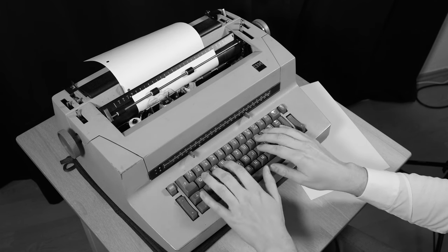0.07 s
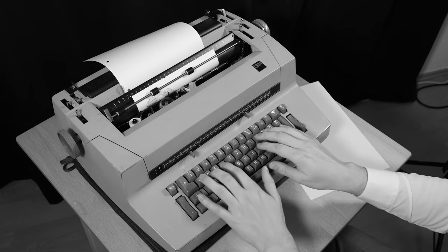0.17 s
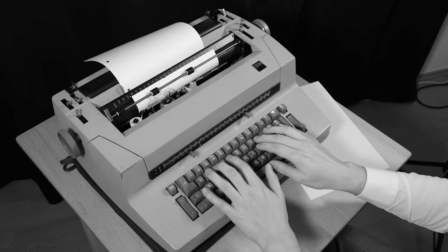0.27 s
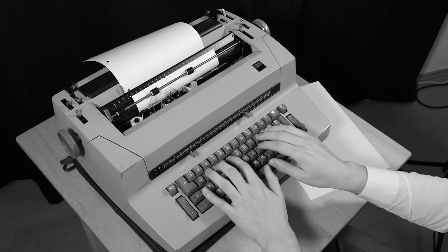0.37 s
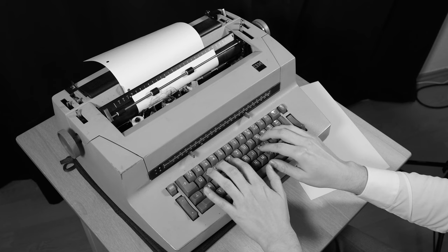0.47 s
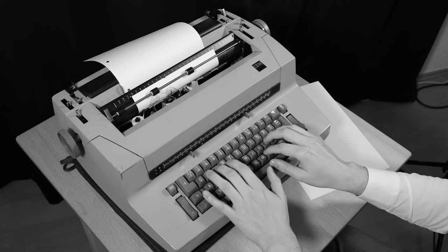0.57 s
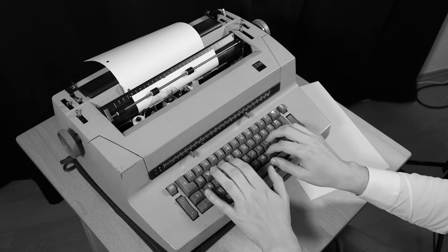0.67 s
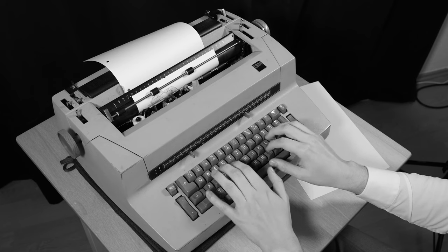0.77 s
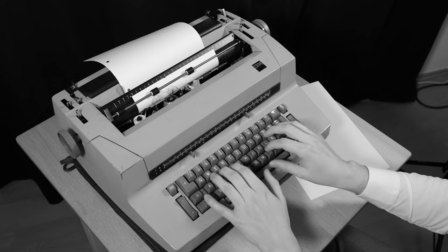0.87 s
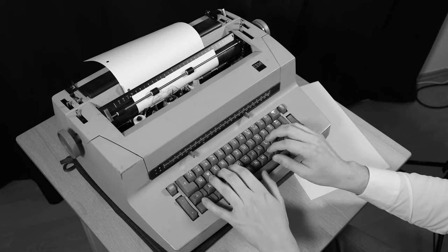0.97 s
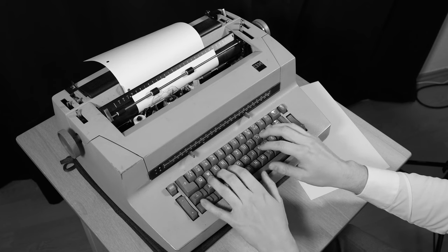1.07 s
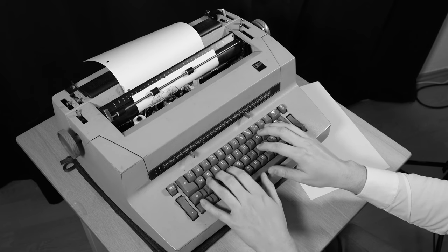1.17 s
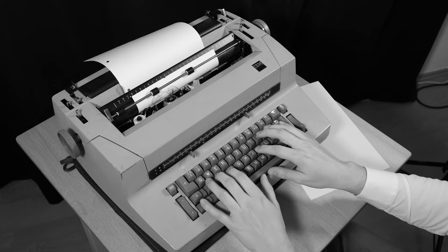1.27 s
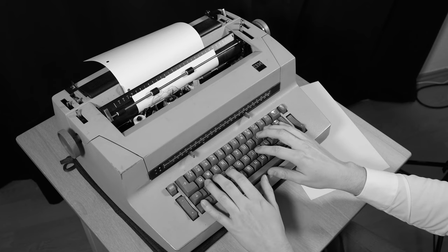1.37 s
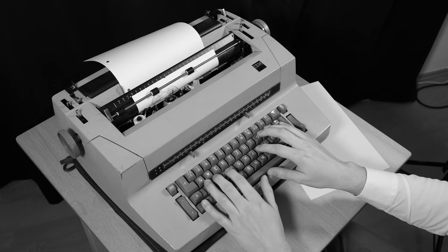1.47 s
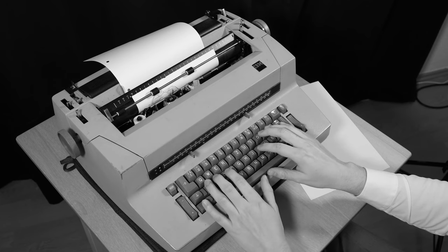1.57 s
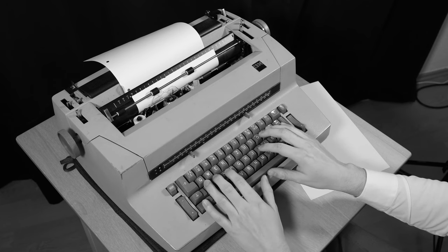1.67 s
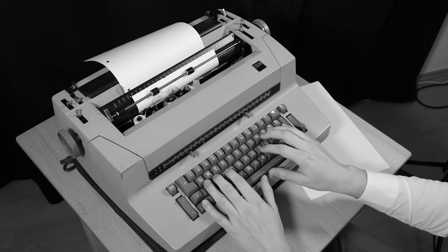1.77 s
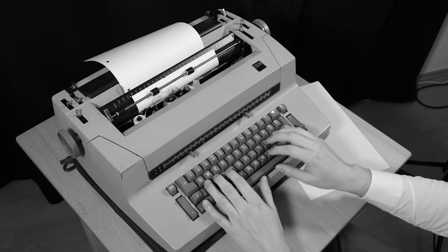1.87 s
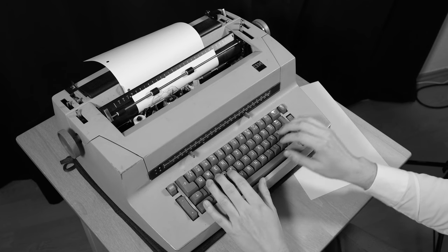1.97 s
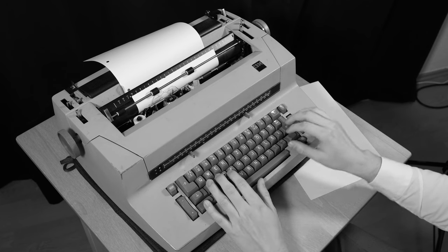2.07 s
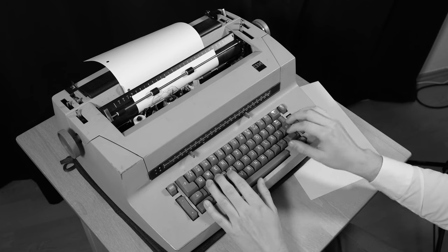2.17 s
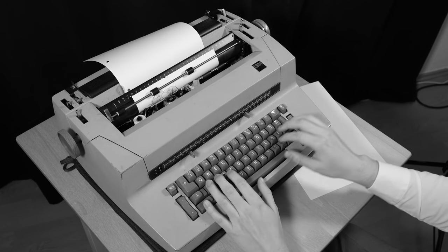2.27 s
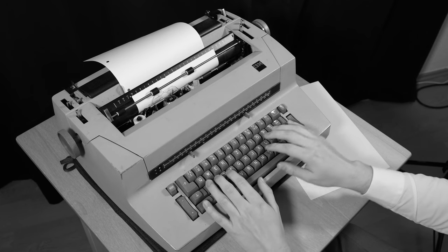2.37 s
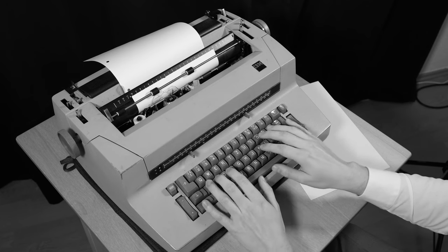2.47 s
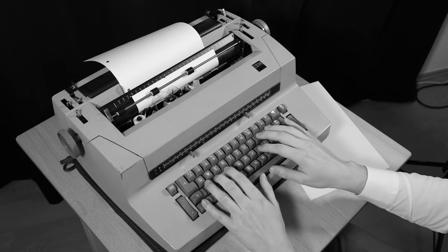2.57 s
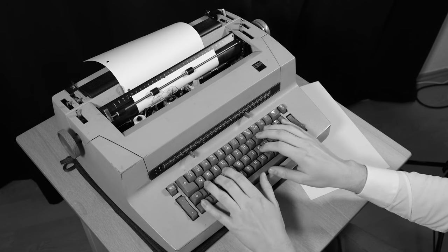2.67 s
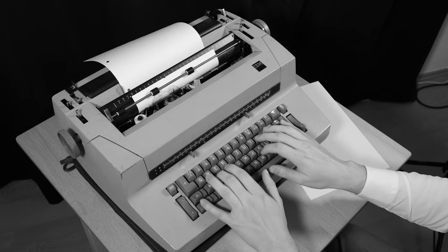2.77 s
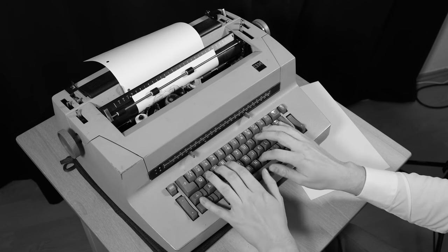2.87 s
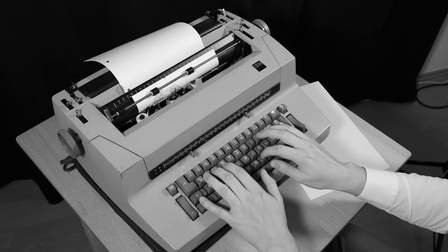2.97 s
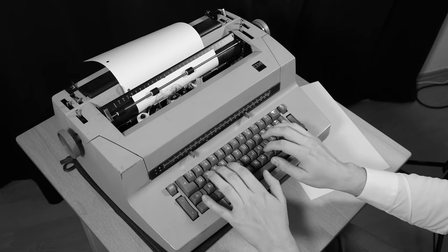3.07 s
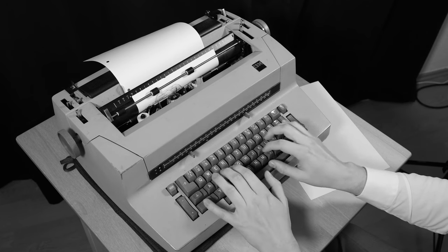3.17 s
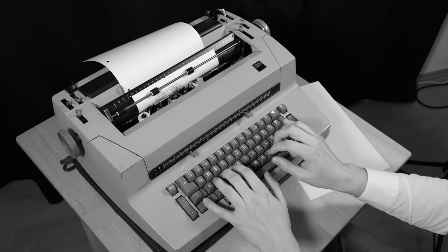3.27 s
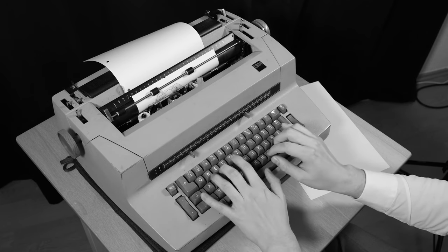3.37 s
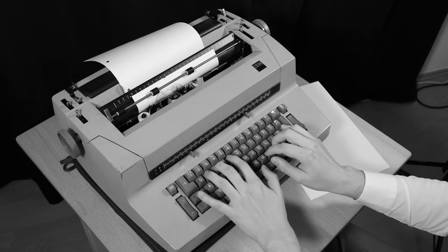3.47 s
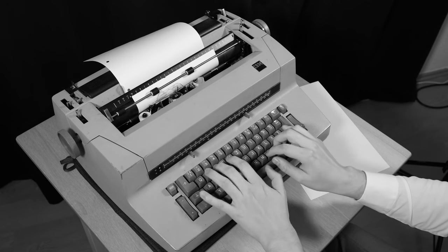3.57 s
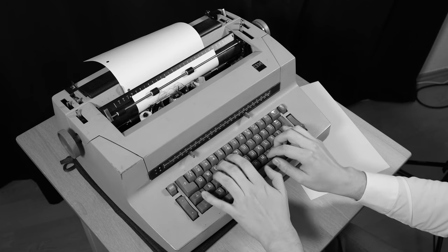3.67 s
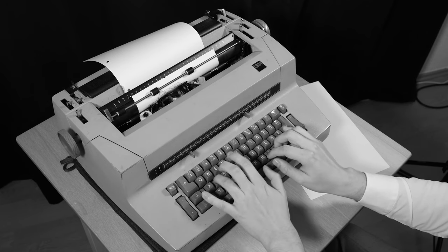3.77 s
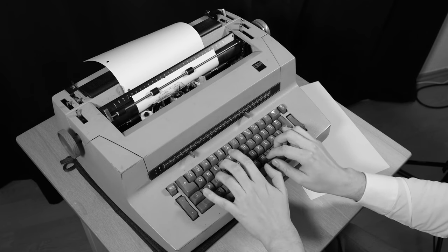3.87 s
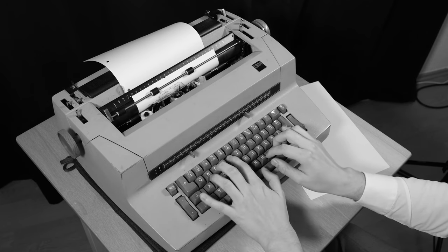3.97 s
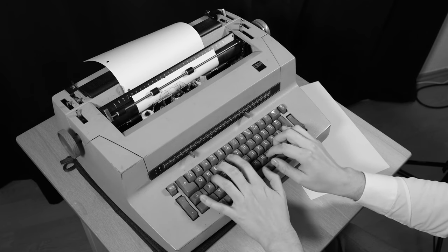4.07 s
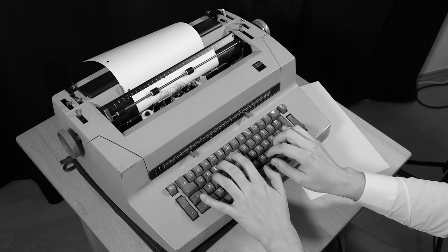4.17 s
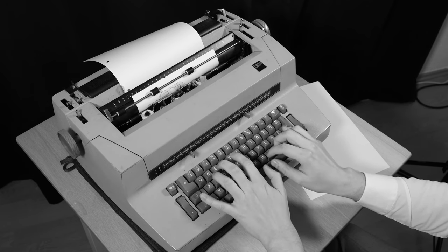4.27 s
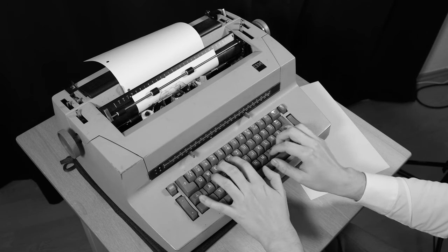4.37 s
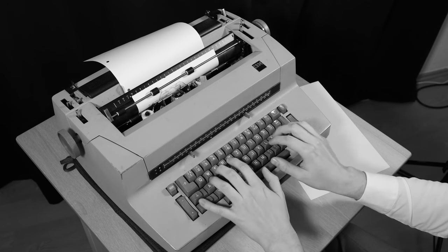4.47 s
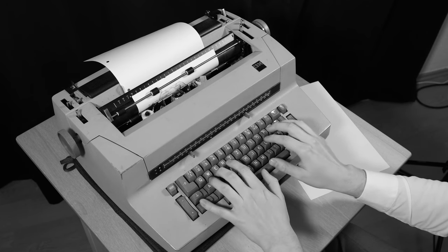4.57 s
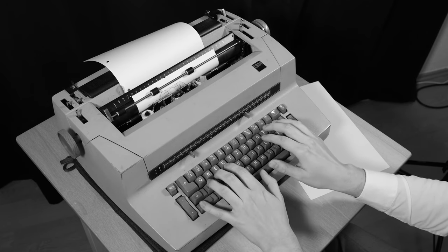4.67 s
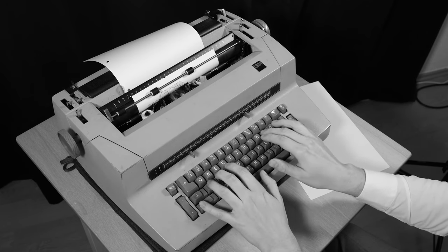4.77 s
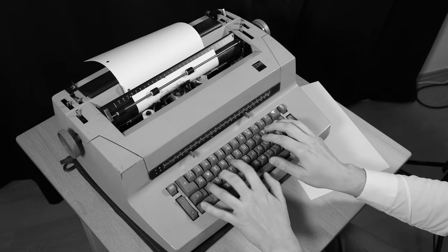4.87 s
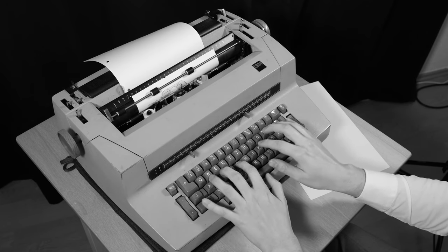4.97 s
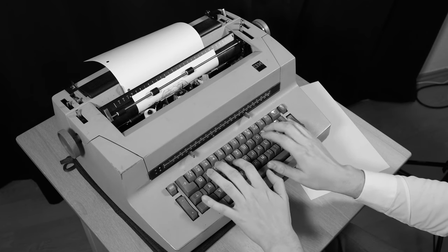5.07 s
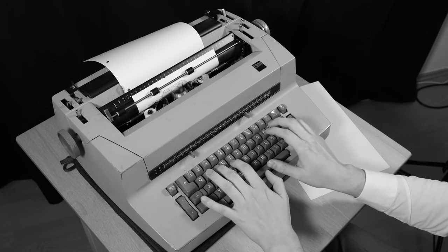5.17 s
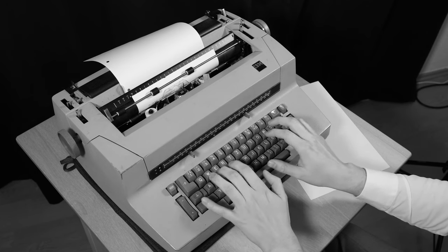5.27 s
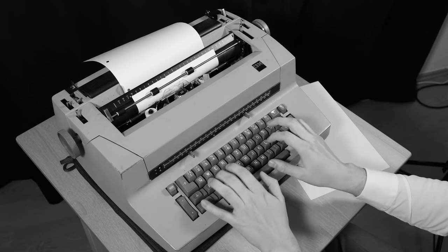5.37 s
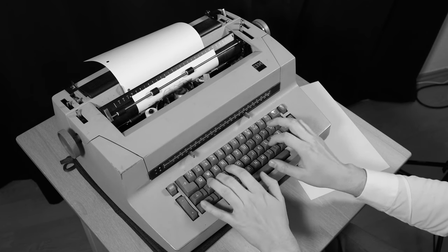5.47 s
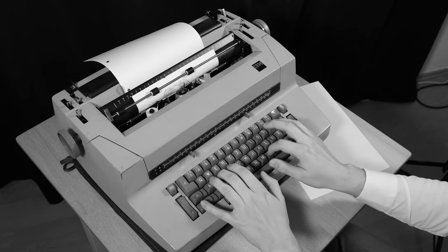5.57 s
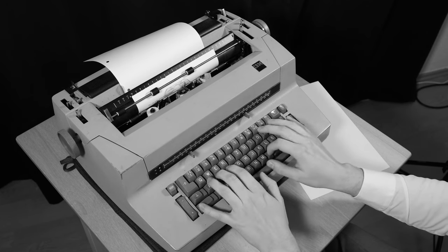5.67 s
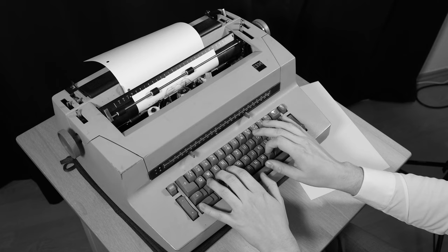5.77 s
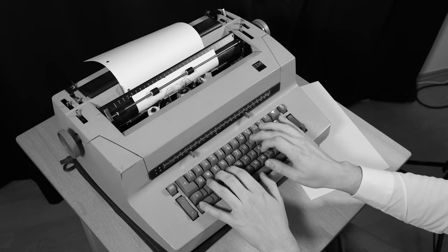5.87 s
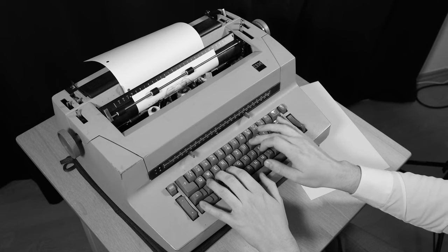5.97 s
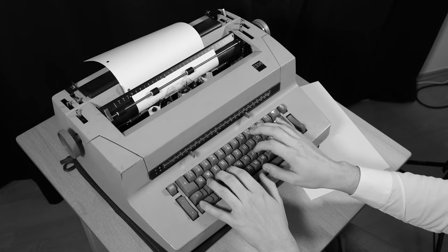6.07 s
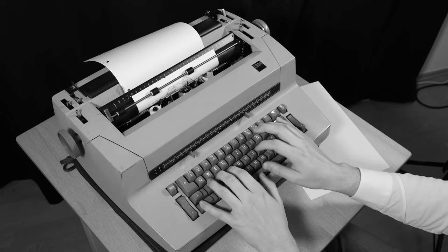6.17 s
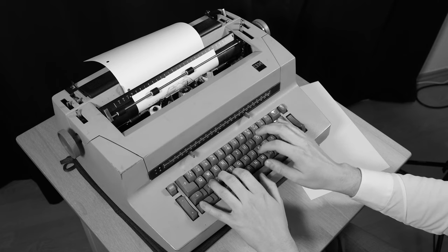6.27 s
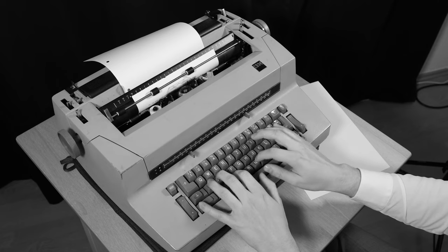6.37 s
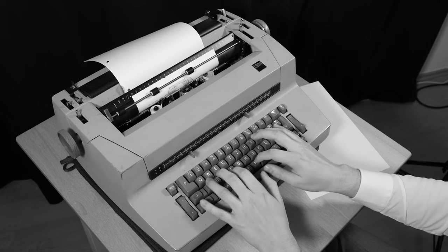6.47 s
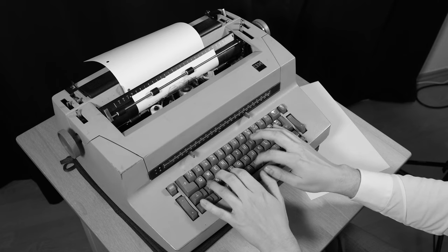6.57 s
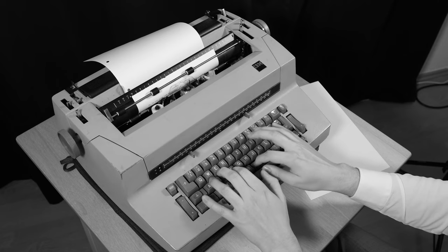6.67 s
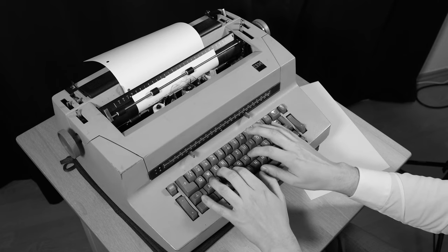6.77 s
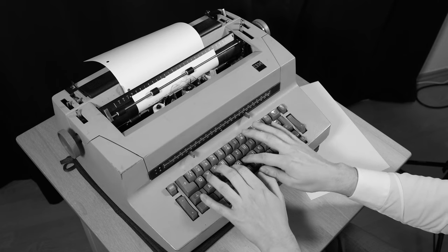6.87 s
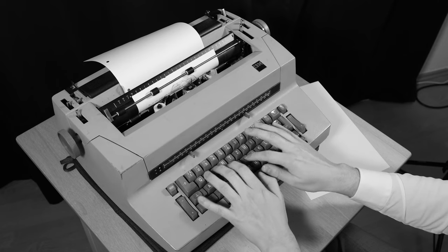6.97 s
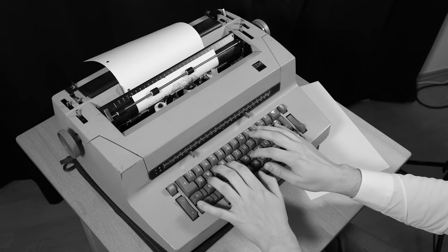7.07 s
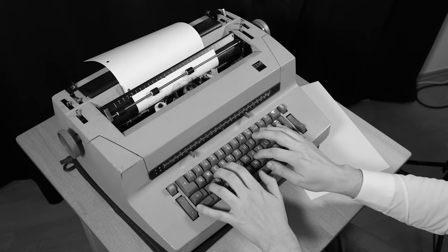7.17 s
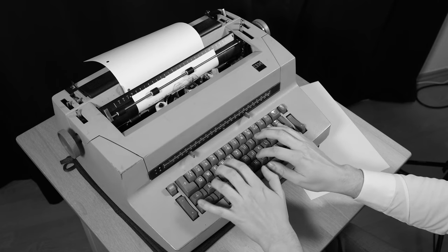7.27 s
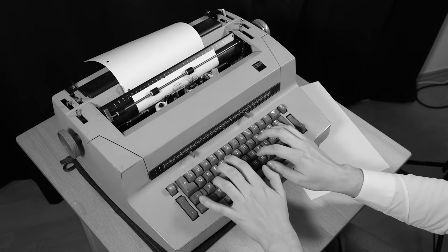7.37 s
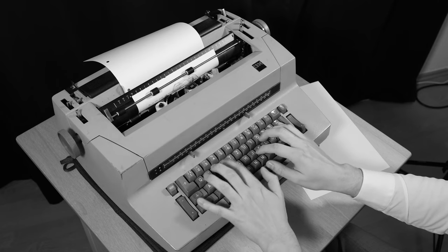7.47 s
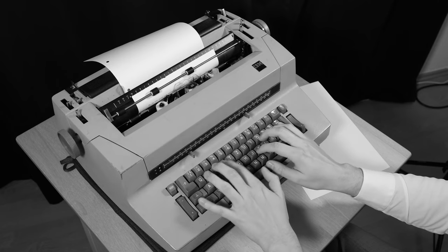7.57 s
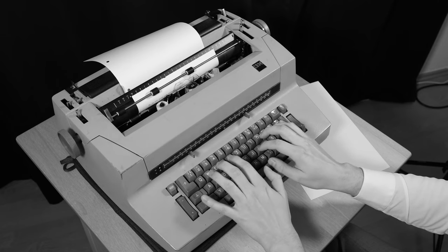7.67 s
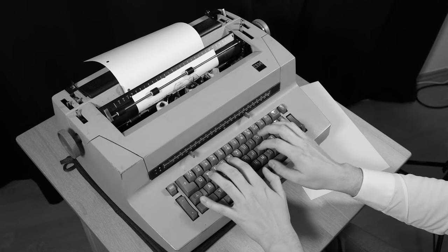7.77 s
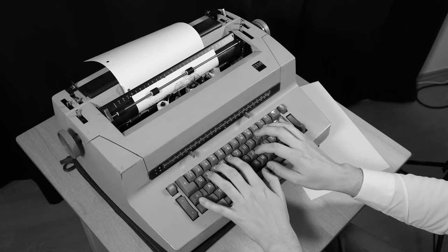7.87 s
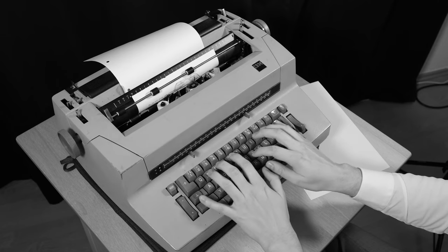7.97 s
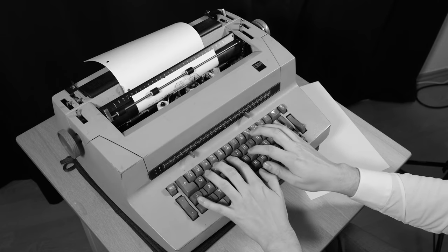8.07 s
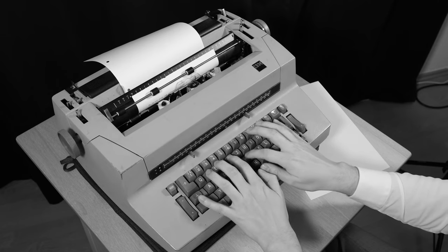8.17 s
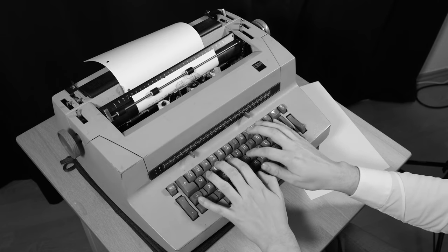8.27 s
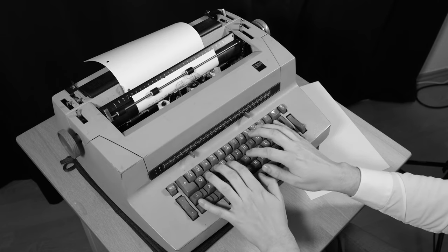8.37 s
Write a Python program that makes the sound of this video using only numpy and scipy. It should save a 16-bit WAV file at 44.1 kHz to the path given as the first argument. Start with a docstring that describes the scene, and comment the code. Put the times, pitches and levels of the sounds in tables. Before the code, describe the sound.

Sharp, heavy typewriter strikes over continuous low motor hum and soft belt rumble. Five letters and a space come first, then a pause with only tiny key movements, then irregular runs with short gaps. Letters snap and clatter as the mechanism falls back; space-bar steps are duller, with a bright bouncing spring rattle. Close, dry microphone with a short indoor room tail and a low desk thump.

```python
"""Quick bursts of hard type strikes over a steady motor hum: an electric type-ball typewriter
on a desk, heard from close by in a small room, with space-bar steps and a spring that jangles.
Each key trips a clutch; the shaft turns, the ball swings and hits the platen, the linkage falls back.
Contacts are impulses and random clacks through coloured filters and damped resonances;
the motor is sine harmonics and hum with filtered noise, the room a decaying noise tail."""
import sys
import numpy as np
from scipy import signal
from scipy.fft import rfft, irfft
from scipy.io import wavfile

SR = 44100
rng = np.random.default_rng(int(sys.argv[2]) if len(sys.argv) > 2 else 0)


def wav_out(sig):
    """Save sig, one row per channel (or a flat mono array), as 16-bit PCM at SR to the path in sys.argv[1]."""
    wavfile.write(sys.argv[1], SR, np.round(np.clip(np.atleast_2d(sig).T, -1, 1) * 32767).astype(np.int16))


N = 372204
TIME = np.arange(N) / SR  # s

# Event levels and spectra are relative: each layer adds its own gain.
# letters: (strike time [s], strike level [dB], clutch latch level [dB], swing level [dB], ball ring level [dB])
LETTERS = [(.0076, -12, -18, -22.5, -54), (0.2226, -10.5, -14.5, -21.5, -31),
           (.3398, -12, -24.5, -26.5, -36), (0.4577, -9.5, -27, -26.5, -41), (.634, -11, -13.5, -24, -50),
           (2.754, -16, -7.5, -27.5, -53), (2.8284, -17, -31, -31.5, -53),
           (2.922, -14.5, -16.5, -30.5, -47), (3.0693, -12.5, -22, -24, -46), (3.532, -14, -14, -19.5, -48),
           (3.6462, -13, -23.5, -28.5, -36.5), (3.806, -12.5, -15.5, -25.5, -40),
           (4.038, -12.5, -13.5, -19.5, -47), (4.8124, -9.5, -11.5, -21.5, -47),
           (4.9082, -9.5, -16.5, -28, -44), (5.0476, -12.5, -18.5, -23, -37), (5.2, -14, -16, -23, -45),
           (5.4977, -16, -6.5, -26, -37), (5.6715, -15.5, -16, -21.5, -35),
           (5.991, -12.5, -9.5, -22.5, -55), (6.4245, -14, -9, -27.5, -36.5), (6.5967, -14, -17, -26, -43),
           (6.6919, -10, -18.5, -30, -39), (6.9625, -13, -11, -28, -55), (7.0736, -13, -20, -29, -37),
           (7.2283, -14, -15.5, -27, -54), (7.5849, -12, -11.5, -19.5, -55), (8.143, -10, -10, -20.5, -41)]
# space bar: (carrier step time [s], step level [dB], bar release time [s], spring level [dB])
SPACES = [(0.891, -22, .9283, -16.5), (3.226, -24, 3.261, -19.5), (5.786, -26.5, 5.830, -20.5),
          (6.166, -22.5, 6.2045, -17.5), (6.817, -27.5, 6.850, -20.5), (7.896, -21, 7.949, -14.5)]
# key levers worked between the letters: (time [s], level [dB])
LEVER_MOVES = [(.813, -26), (.834, -21), (1.225, -37), (1.827, -42), (1.878, -44.5), (2.270, -45),
               (2.3737, -38), (2.478, -38.5), (3.16, -25), (4.744, -23.5), (6.082, -26.5), (6.103, -25),
               (6.349, -32.5), (6.786, -21.5), (7.819, -21.5), (7.838, -19.5), (8.298, -37.5), (8.372, -35),
               (8.406, -29.5)]
# fingertips landing softly on the keys: (time [s], level [dB])
FINGER_TOUCHES = [(1.685, -39), (1.716, -44), (2.046, -38.5)]

# force of each movement: (start from its event [s], attack [s], hold [s], release to -60 dB [s])
SHAFT_TURN = (-0.0521, 0.0165, 0.011, 0.13)
# same columns; the negative release ends the force abruptly, before the hold is over
BALL_SWING = (-0.0334, 0.0235, .011, -0.003)
# the linkage falling back, and the shake it gives the frame: same columns
FALL_BACK = (-0.0015, 0.0003, 0.027, .055)
FRAME_SHAKE = (.003, .004, .006, .14)
# carrier step, key lever slide and spring buzz: same columns
CARRIER_STEP = (-0.029, 0.0109, .02, 0.11)
KEY_SLIDE = (-0.0035, 0.0051, 0.003, 0.075)
SPRING_BUZZ = (-.0005, 0.0024, 0.0018, 0.056)

# colour of the contacts of each part: (frequency [Hz], level [dB])
LATCH_COLOUR = [(150, -18), (700, -24.5), (1100, -16), (1900, -10.5), (2650, 3), (3300, -9.5), (4100, -4),
                (4900, -6), (5900, -1.5), (7200, -2.5), (9000, -4.5), (15000, -20.5)]
STRIKE_COLOUR = [(120, 5), (550, 0.5), (850, -38.5), (1450, 1), (2050, 2), (2500, -6.5), (3050, 3.5),
                 (4000, -17), (5500, -4), (9000, -14.5), (15000, -35.5)]
SHAFT_COLOUR = [(120, -19.5), (450, -8.5), (620, -2), (730, -10), (850, -6), (1250, -8), (1700, -12),
                (2200, -6.5), (3000, -2.5), (4500, -9.5), (7000, -11.5), (10000, -18), (15000, -27.5)]
SWING_COLOUR = [(150, -30.5), (600, -4), (1150, -0.5), (1700, -9.5), (2200, -3.5), (3100, -3.5),
                (4500, -4.5), (5700, -4), (7000, -7), (10500, -7), (15000, -17)]
FALL_COLOUR = [(150, -22.5), (650, -17.5), (930, -3), (1250, -5), (1700, -23), (2200, -11), (3000, -4.5),
               (4500, -9), (7000, -11.5), (9500, -8.5), (12000, -15.5), (15000, -25)]
STEP_COLOUR = [(100, -29), (250, -4.5), (600, -13), (1000, -0.5), (1700, -11.5), (2200, -9.5), (3200, -2.5),
               (4500, -7), (7000, -11), (10000, -13), (15000, -24.5)]
KEY_COLOUR = [(200, 2.5), (1000, -1.5), (2400, 1), (4500, -0.5), (7000, -0.5), (10000, -2.5),
              (15000, -12.5)]
COIL_COLOUR = [(400, -1.5), (1500, -2), (5500, -1.5), (7100, 2.5), (8000, 1.5), (10300, 0), (11100, 10.5),
               (11700, 5), (12200, 2), (13800, 0.5), (14400, -10), (15500, -5.5)]
# plastic key caps under a fingertip: (frequency [Hz], level [dB])
CAP_COLOUR = [(300, 3), (1500, 2), (3200, -4.5), (6000, -16), (15000, -32)]

# ringing parts: (frequency [Hz], resonance height [dB], decay to -60 dB [s])
FRAME_MODES = [(190, -9, .09), (207, 1, .13), (272, -3, .07), (290, 3, .12), (337, -7, .08), (440, -9, .07),
               (495, -5, .08), (575, -11, .07), (622, -8, .07), (708, -8, .07), (775, -10, .06),
               (880, -8, .05), (962, -4, .06), (1254, -8, .07)]
BALL_MODES = [(9494, 0, .16), (13414, -8, .07), (7440, -8, .06)]
SPRING_MODES = [(2070, -5, .04), (2112, -3, .06), (2835, -7, .07), (2940, -5, .05), (3846, -4, .06),
                (3912, -5, .09), (4646, -10, .06), (6126, -14, .14), (7170, -12, .12), (8285, -11, .2),
                (11130, -12, .07), (11570, -12, .07)]
DESK_MODES = [(61.5, 0, .9), (66.5, -1, .9), (133, -4.5, .25)]
CAM_MODES = [(622, 0, .06), (712, -1, .05)]
# the whole frame, jerked by the swinging carrier: same columns
JERK_MODES = [(182, -2.5, 0.068), (204.6, 5, .09)]
# rub of the slow drive shaft: same columns
RUB_MODES = [(2350, 0, .014)]

# motor harmonics: (multiple of the turning rate [1], rms level [dB])
MOTOR_ORDERS = [(9, -56.5), (10, -51.5), (11, -59.5), (18, -74.5), (20, -61.5), (27, -67.5), (29, -69.5),
                (31, -74.5), (36, -68), (40, -67)]
# mains hum: (frequency [Hz], rms level [dB])
MAINS_HUM = [(100, -57.5), (200, -56.5)]
# outline of the belt rumble and hiss: (frequency [Hz], level [dB])
BELT_COLOUR = [(30, -24.5), (80, -11), (130, -26), (175, -18), (215, -6.5), (255, -0.5), (330, -5.5),
               (400, -16), (700, -15), (960, -17.5), (1700, -27), (3000, -31), (6000, -35), (15000, -44)]

MOTOR_HZ = 24.21  # mean turns per second
BELT_DB = -50  # before it swells with the turn
TOP_HZ = 15900  # edge of the recorder's treble cut
# the motor drives every cycle alike, so these two levels are shared by all letters
FALL_DB, THUD_DB = -24, -28.5
JERK_LEAD_S = .016  # before the strike
# a letter's key slides ahead of its strike, at a level relative to its latch
KEY_LEAD_S, KEY_DB = 0.0638, -16.5
# the released bar bounces: first flight, share left for each next flight, level change per bounce
FLIGHT_S, REBOUND, BOUNCE_DB = 0.0344, 0.5, -7
# its far end lands later and weaker
FAR_END_S, FAR_END_DB = 0.01, -4


def undb(db):
    """Decibels to amplitude gain."""
    return 10 ** (np.asarray(db) / 20)


def fall_60(t, t60):
    """Exponential decay that has dropped by 60 dB at t60 seconds."""
    return np.exp(-np.log(1000) * t / t60)


def through(x, response):
    """Pass a sound through an impulse response scaled to unit energy."""
    return signal.oaconvolve(x, response / np.sqrt(np.sum(response ** 2)))[:N]


def colour(x, spectrum, size=2048):
    """Filter with the given spectral outline; minimum phase, so nothing sounds ahead of its blow."""
    hz, db = np.transpose(spectrum)
    bins = np.maximum(np.arange(size // 2 + 1) * SR / size, 1)
    outline_db = np.interp(np.log(bins), np.log(hz), db)
    # folding the cepstrum makes the response causal
    cepstrum = irfft(np.log(undb(outline_db)))
    cepstrum[1:size // 2] *= 2
    cepstrum[size // 2 + 1:] = 0
    return through(x, irfft(np.exp(rfft(cepstrum))))


def ring(x, modes):
    """Excite damped resonances; dividing by the decay time makes the dB the height of each peak."""
    t = TIME[:SR * 2 // 3]
    response = np.zeros(len(t))
    for hz, db, t60 in modes:
        response += undb(db) / t60 * fall_60(t, t60) * np.cos(2 * np.pi * hz * t)
    return through(x, response)


def walk(rate):
    """Slow random drift about zero, joining normal draws taken at the given rate [1/s]."""
    return np.interp(TIME * rate, np.arange(N // 100), rng.standard_normal(N // 100))


def blows(times, db):
    """One impulse for each blow."""
    out = np.zeros(N)
    inside = (times >= 0) & (times < TIME[-1])
    np.add.at(out, (times[inside] * SR).astype(int), undb(db[inside]))
    return out


def chatter(times, db, t60, tail_db):
    """A hard contact followed by fading micro-bounces, drawn as decaying noise."""
    hits = blows(times, db)
    fade = fall_60(TIME[:SR // 20], t60)
    return hits + undb(tail_db) * through(hits, fade) * rng.standard_normal(N)


def rattle(times, db, stage, rate, scatter_db, t60, count=40, size=256):
    """Loose parts touch at random, as hard as the movement drives them, each with a short clack."""
    start, attack, hold, release = stage
    force = np.zeros(N)
    for s, level_db in np.broadcast(times + start, db):
        a, b = np.searchsorted(TIME, [s, s + attack + hold + release])
        t = TIME[a:b] - s
        rise = np.minimum(t / attack, 1)
        force[a:b] += undb(level_db) * rise * fall_60(np.maximum(t - attack - hold, 0), release)
    # a stock of decaying noise clacks of unit energy
    clacks = rng.standard_normal((count, size)) * fall_60(TIME[:size], t60)
    clacks /= np.linalg.norm(clacks, axis=1, keepdims=True)
    when, strength = rng.random((2, N))
    at = np.flatnonzero((when < rate / SR) & (force > 0))
    touch = undb(scatter_db * strength[at])
    # rate and scatter change the grain, not the mean power
    touch *= force[at] * np.sqrt(SR / rate / np.mean(touch ** 2))
    places = at[:, None] + np.arange(size)
    sounds = touch[:, None] * clacks[at % count]
    return np.bincount(places.ravel(), sounds.ravel(), N + size)[:N]


def letters():
    """The print cycle: latch, shaft, ball swing, detent, strike, escapement and fall-back shake the frame."""
    s, strike_db, latch_db, swing_db, ball_db = np.transpose(LETTERS)
    fall_db, thud_db = np.full(len(s), FALL_DB), np.full(len(s), THUD_DB)
    # the shaft turns at one speed, so its contacts keep their places around the strike
    tripped, gripped, locked = s - .055, s - .037, s - .007
    recoiled, stepped = s + .007, s + .021

    latch = undb(13) * colour(chatter(tripped, latch_db, t60=0.013, tail_db=5.0), LATCH_COLOUR)
    turning = rattle(s, swing_db, SHAFT_TURN, rate=1200, scatter_db=-2.5, t60=0.015)
    shaft = undb(-0.74) * colour(turning, SHAFT_COLOUR)
    cams = undb(21.5) * ring(blows(gripped, swing_db), CAM_MODES)

    detents = rattle(s, swing_db, BALL_SWING, rate=1500, scatter_db=10.5, t60=0.0091)
    lock = chatter(locked, swing_db, t60=0.01, tail_db=19.0)
    swing = colour(undb(3.0) * detents + undb(2.0) * lock, SWING_COLOUR)
    ball = undb(36) * ring(blows(locked, ball_db), BALL_MODES)
    strike = undb(19.5) * colour(chatter(s, strike_db, t60=.005, tail_db=-4), STRIKE_COLOUR)

    levers = rattle(s, fall_db, FALL_BACK, rate=1200, scatter_db=18.5, t60=0.016)
    escapement = chatter(stepped, fall_db, t60=.009, tail_db=16)
    fall = colour(undb(0.85) * levers + undb(8.0) * escapement, FALL_COLOUR)

    shaft_shake = undb(-3.5) * rattle(s, thud_db, SHAFT_TURN, rate=1500, scatter_db=0, t60=0.0036)
    fall_shake = undb(5.5) * rattle(s, thud_db, FRAME_SHAKE, rate=1500, scatter_db=5.5, t60=0.0038)
    thud = undb(29.5) * blows(recoiled, thud_db)
    frame = ring(thud + shaft_shake + fall_shake, FRAME_MODES)
    jerk = undb(21.5) * ring(blows(s - JERK_LEAD_S, swing_db), JERK_MODES)
    return latch + shaft + cams + swing + ball + strike + fall + frame + jerk


def space_bar():
    """The carrier steps along without printing and shakes the frame."""
    s, db = np.transpose(SPACES)[:2]
    step = rattle(s, db, CARRIER_STEP, rate=1400, scatter_db=2.0, t60=0.0083)
    shake = rattle(s + 0.012, db, CARRIER_STEP, rate=1500, scatter_db=13.0, t60=0.0028)
    return undb(0.5) * colour(step, STEP_COLOUR) + undb(-0.5) * ring(shake, FRAME_MODES)


def spring(count=3):
    """The space bar's spring snaps back, buzzes on its stop in ever shorter, weaker bounces and rings."""
    s, db = np.transpose(SPACES)[2:, :, None]
    bounce = np.arange(count)
    flights = FLIGHT_S * REBOUND ** bounce
    lands = (s + np.cumsum(flights) - flights).ravel()  # the first landing is the release itself
    land_db = (db + BOUNCE_DB * bounce).ravel()
    ends = np.r_[lands, lands + FAR_END_S]
    end_db = np.r_[land_db, land_db + FAR_END_DB]
    buzz = rattle(ends, end_db, SPRING_BUZZ, rate=1400, scatter_db=11, t60=0.0035)
    snaps = chatter(ends, end_db, t60=.025, tail_db=14.5)
    coil = colour(undb(-2.5) * buzz + undb(3.5) * snaps, COIL_COLOUR)
    return coil + undb(-5.5) * ring(buzz, SPRING_MODES)


def keys():
    """Key levers scrape in their guides, one just ahead of every latch; fingertips tap the plastic caps."""
    s, _, latch_db, _, _ = np.transpose(LETTERS)
    letter_keys = np.column_stack([s - KEY_LEAD_S, latch_db + KEY_DB])
    times, db = np.vstack([letter_keys, LEVER_MOVES]).T
    scrapes = rattle(times, db, KEY_SLIDE, rate=1600, scatter_db=-0.5, t60=0.0063)
    taps = chatter(*np.transpose(FINGER_TOUCHES), t60=0.051, tail_db=7.5)
    return undb(-3.5) * colour(scrapes, KEY_COLOUR) + undb(10.5) * colour(taps, CAP_COLOUR)


def desk():
    """Every cycle rocks the machine on the desk; two close modes beat and the motor keeps them stirring."""
    s = np.array([row[0] for row in list(LETTERS) + list(SPACES)])
    jolts = blows(s - .02, np.full(len(s), -11))
    stirring = undb(-57.0) * rng.standard_normal(N)
    sway = ring(jolts + stirring, DESK_MODES)
    return signal.sosfilt(signal.butter(5, 53, "high", fs=SR, output="sos"), sway)


def motor():
    """Harmonics of a slightly unsteady turn, mains hum, belt rumble and a faint rub of the slow drive shaft."""
    turn = 2 * np.pi * np.cumsum(MOTOR_HZ * (1 + 0.0039 * walk(9))) / SR  # phase [rad]
    whine = np.zeros(N)
    for order, db in MOTOR_ORDERS:
        phase = rng.uniform(0, 2 * np.pi)
        whine += undb(db + 1.4 * walk(26)) * np.sin(np.round(order) * turn + phase)
    hum = sum(undb(db) * np.sin(2 * np.pi * hz * TIME) for hz, db in MAINS_HUM)
    swell = 1 + .35 * np.sin(2 * turn)  # twice per turn
    belt = undb(BELT_DB) * colour(rng.standard_normal(N) * swell, BELT_COLOUR, size=8192)
    contact = np.cos(np.pi * 8.34 * (TIME - .037)) ** 12  # 8.34 short touches per second
    rub = undb(-60.5 + 2 * walk(6)) * contact * ring(rng.standard_normal(N), RUB_MODES)
    return np.sqrt(2) * (whine + hum) + belt + rub  # sqrt(2) turns rms levels into sine peaks


def room(x, t60_low, t60_high):
    """Diffuse reflections that build up quickly and lose their treble first."""
    t = TIME[:SR * 2 // 3]
    low_pass = signal.butter(2, 4500, fs=SR, output="sos")
    high_pass = signal.butter(2, 4500, "high", fs=SR, output="sos")
    low = signal.sosfilt(low_pass, rng.standard_normal(len(t)))
    high = signal.sosfilt(high_pass, rng.standard_normal(len(t)))
    tail = low * fall_60(t, t60_low) + undb(-1) * high * fall_60(t, t60_high)
    build_up = 1 - np.exp(-(t / 0.0053) ** 2)
    return through(x, tail * build_up)


def scene():
    """The machine close to the microphone, with its room; its small parts radiate little bass."""
    small_parts = signal.butter(6, 176, "high", fs=SR, output="sos")
    typing = signal.sosfilt(small_parts, letters() + space_bar() + keys())
    jangle = spring()
    # the spring sits low under the keyboard and sends less into the room
    walls = room(typing + undb(-3.5) * jangle, t60_low=0.4, t60_high=0.27)
    return (typing + jangle + undb(-13.5) * walls + desk() + motor())[None]


def record(dry):
    """The recorder clips at full scale, then cuts the top of the treble."""
    treble_cut = signal.ellip(10, .2, 70, TOP_HZ, fs=SR, output="sos")
    return signal.sosfilt(treble_cut, np.clip(dry, -1, 1))


dry = scene()
out = record(dry)
wav_out(out)
```